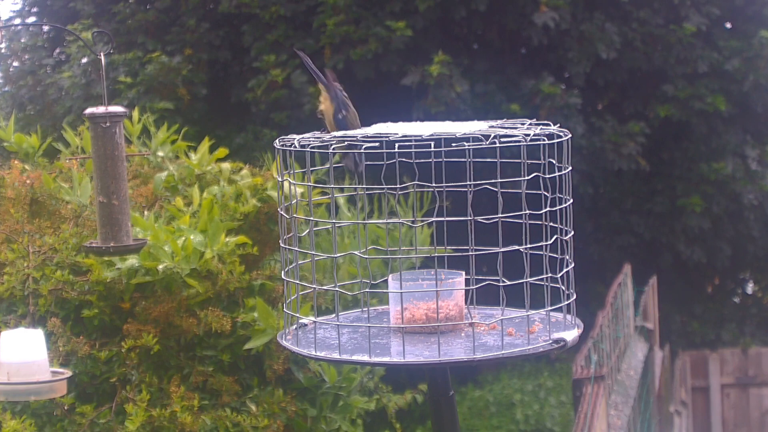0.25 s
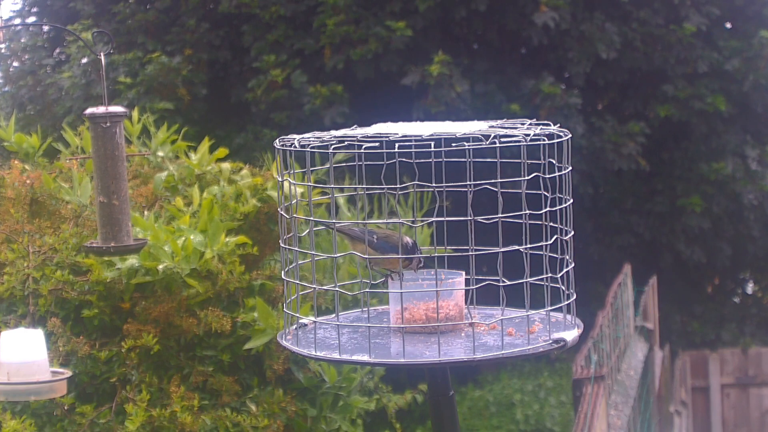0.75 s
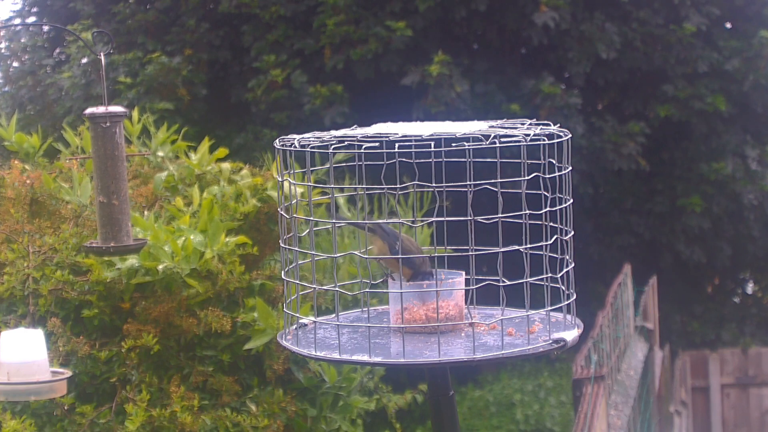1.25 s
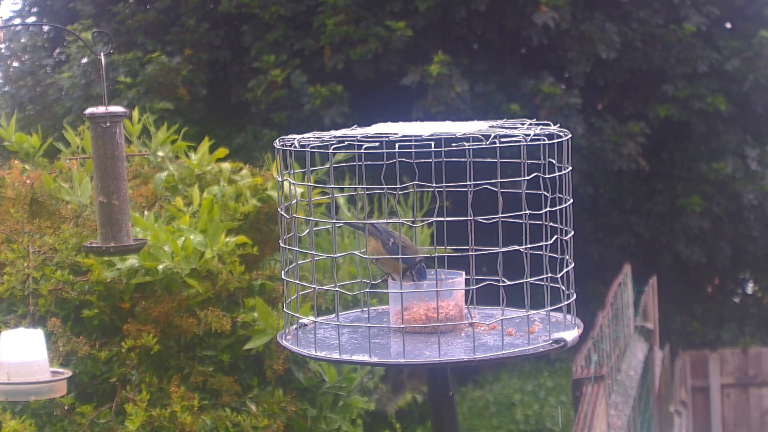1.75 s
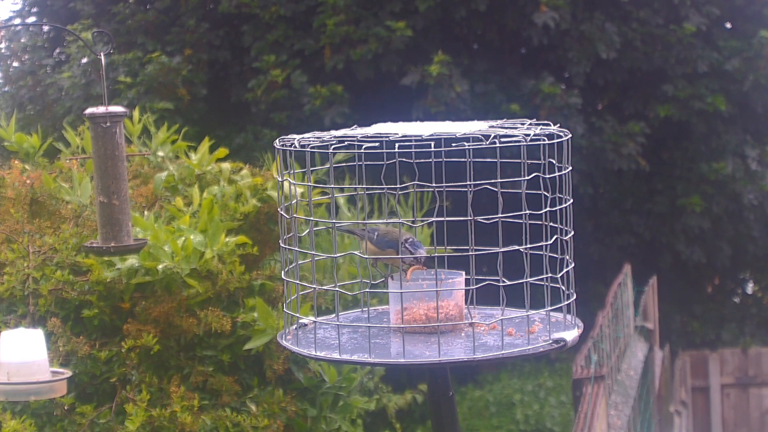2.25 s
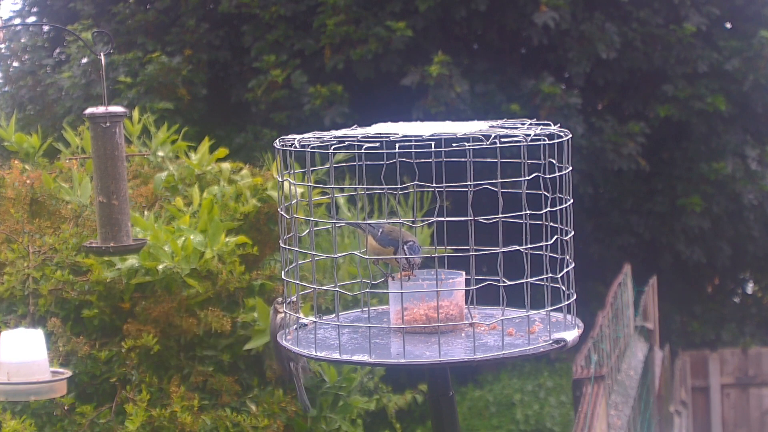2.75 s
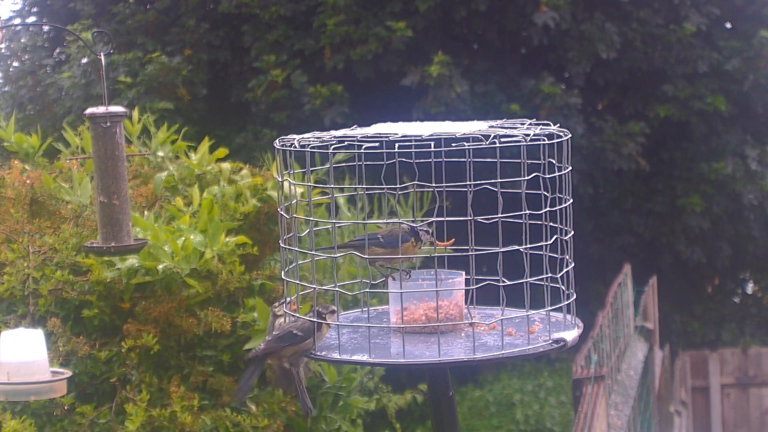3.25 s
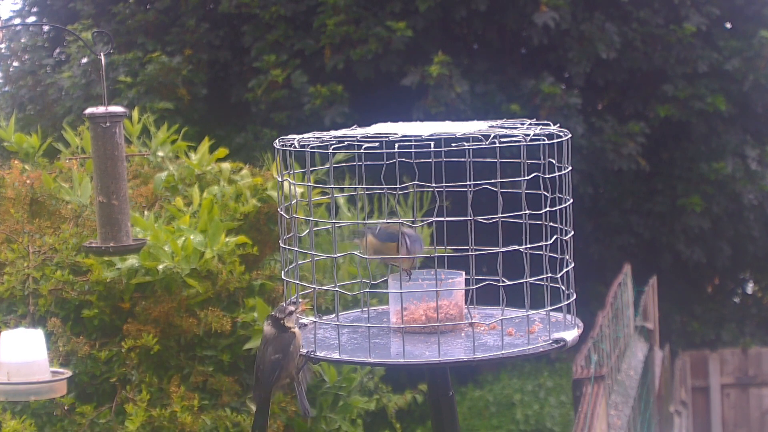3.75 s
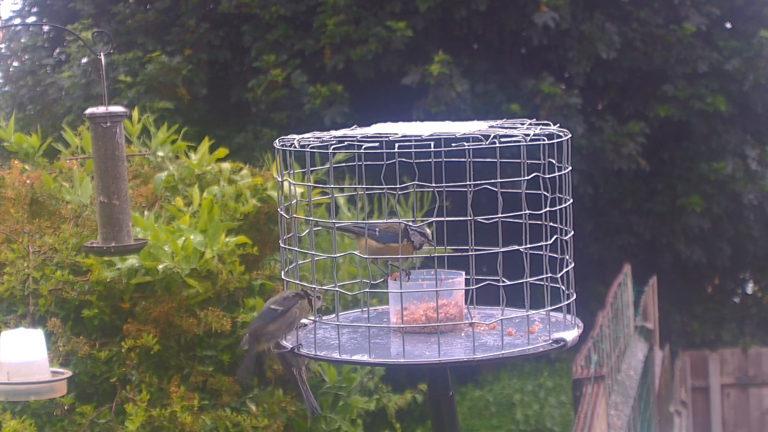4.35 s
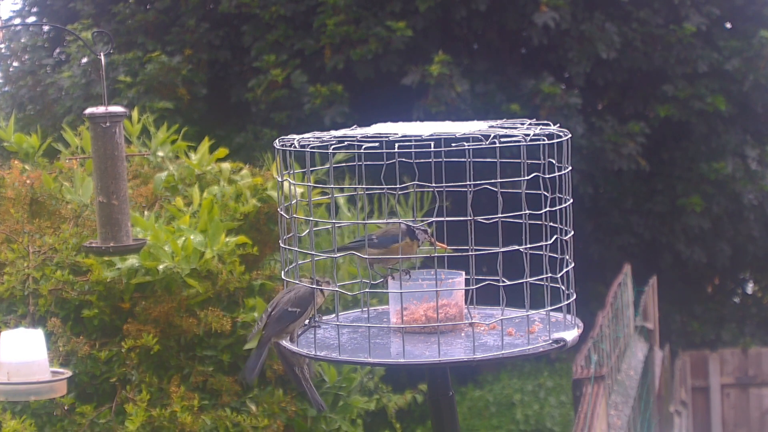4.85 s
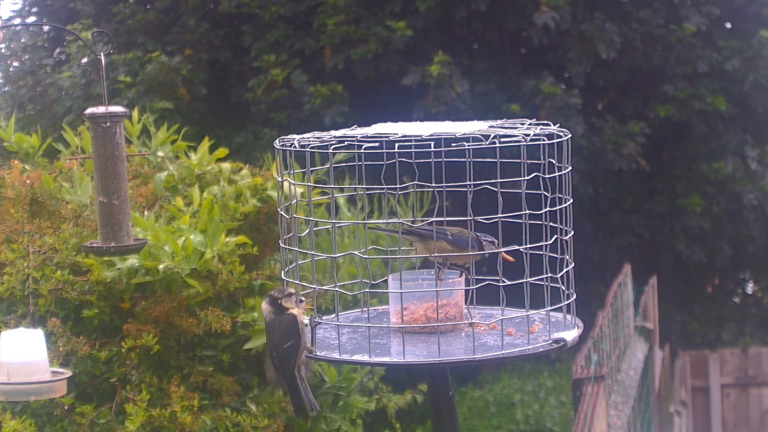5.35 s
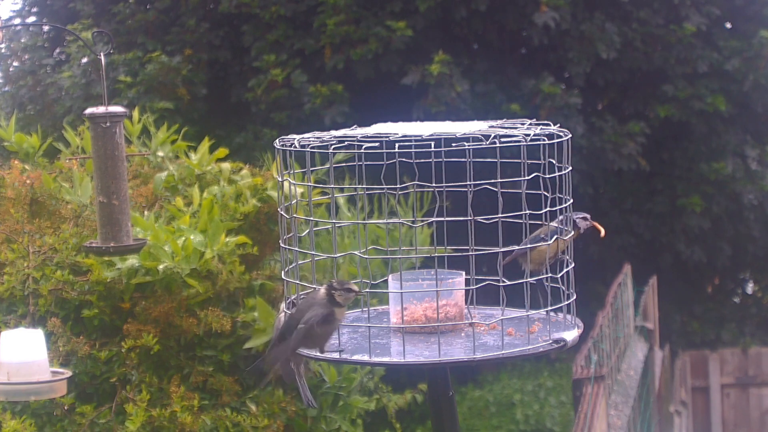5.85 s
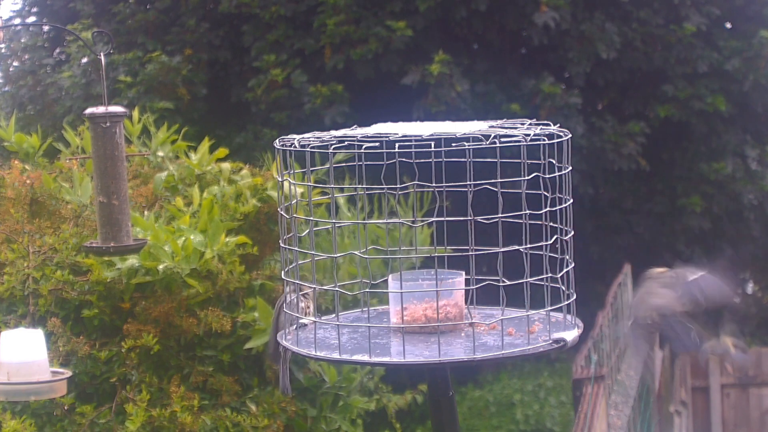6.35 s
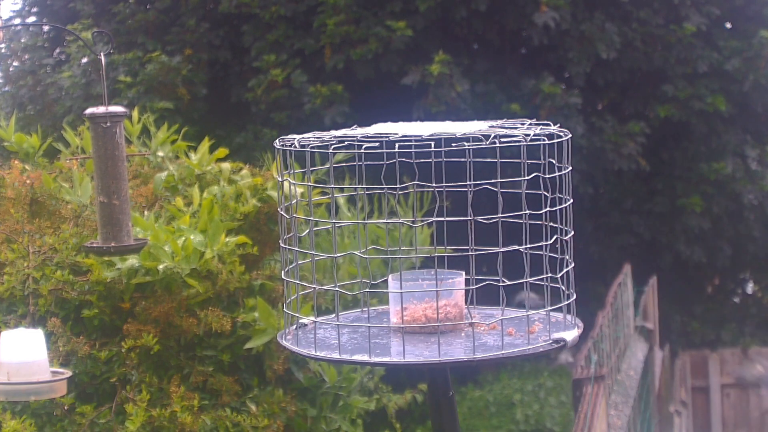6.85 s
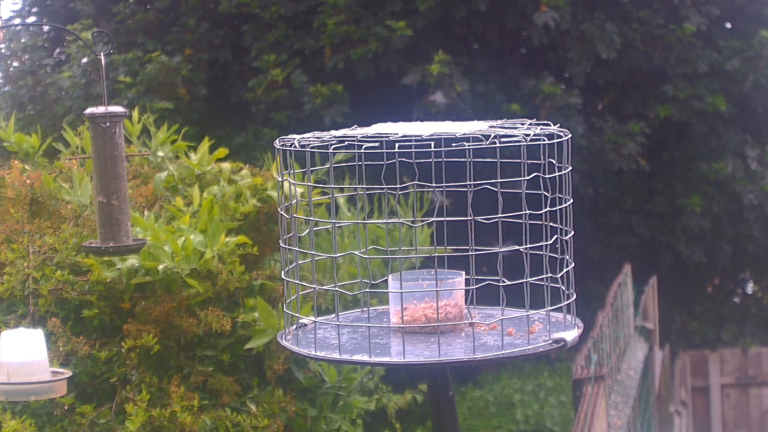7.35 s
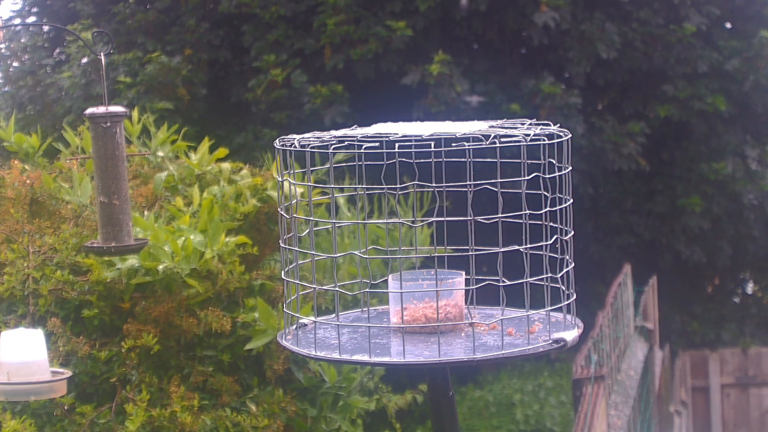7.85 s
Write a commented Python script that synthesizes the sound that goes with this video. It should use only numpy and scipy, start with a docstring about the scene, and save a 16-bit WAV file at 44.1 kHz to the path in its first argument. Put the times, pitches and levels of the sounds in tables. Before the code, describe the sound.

A young blue tit gives high chirps and raspy begging calls, with light ticks on wire, over steady outdoor hiss, rumble and hum.

```python
"""Blue tits at a caged garden feeder, over steady rumble, hiss and a small camera's mains hum.
A fledgling begs with both sides of its syrinx: first a faint wail, then rising chirps and whistles
that plunge. At 1.6 s a far engine winds down. From 3 s claws and beak tick on the wire; rasping
two-voiced wails follow from 3.5 to 7 s, with distant bird notes at 5.5 and 6.5 s. Fading chirps and
one tick end it. Fledgling and cage echo off the foliage and ring the camera's microphone."""
import sys
import numpy as np
from scipy import signal
from scipy.fft import rfft, irfft, next_fast_len
from scipy.io import wavfile
from scipy.ndimage import uniform_filter1d, map_coordinates

SR = 44100
rng = np.random.default_rng(int(sys.argv[2]) if len(sys.argv) > 2 else 0)


def bounce(signal):
    """Save signal as a 16-bit WAV file at the path given by the first command-line argument."""
    frames = np.transpose(np.atleast_2d(signal))
    limited = np.clip(frames, -1, 1)
    pcm = np.round(limited * 32767).astype(np.int16)
    wavfile.write(sys.argv[1], SR, pcm)


N = 357210

# mains hum and a motor line: freq_hz, rms_db
HUM_LINES = [(50, -53), (100, -66.5), (150, -64.5), (165.9, -69.5), (250, -77), (350, -91)]
# outdoor rumble spectrum: freq_hz, relative_db
RUMBLE_SPECTRUM = [(12, -16.5), (24, 4), (40, -2.5), (70, -6), (110, -13), (140, -7.5), (190, -16.5),
                   (260, -18.5), (400, -21.5), (700, -30), (1200, -40)]
# rain-like hiss spectrum: freq_hz, relative_db
HISS_SPECTRUM = [(350, -38), (600, -26.5), (850, -20.5), (1310, -15.5), (1870, -13), (2100, -10.5),
                 (2330, 1), (2450, 1.5), (2950, -12.5), (3630, -13), (4460, -28), (7420, -37), (8000, -41)]
# upper voice against lower: lower_pitch_hz, gain_db
UPPER_BALANCE = [(2000, 2), (2600, -2.5), (3300, 4.5), (4300, -13), (5800, -18), (7000, -37.5)]
# overtones, strongest on low pressed notes: lower_pitch_hz, gain_db
OVERTONE_GAIN = [(1900, 19), (2300, 6.5), (3200, 3), (4200, -5), (5000, -28)]
# hoarseness: lower_pitch_hz, noise_share
HOARSENESS = [(1900, .2), (2450, .4), (2900, .24), (3400, .16), (5000, .2), (6500, .08)]
# overtone gain as the open beak turns: time_s, gain_db
BEAK_BRIGHTNESS = [(0, -7), (3.1, -10.5), (3.45, 1), (4, 7), (4.21, 1.5), (4.35, 4), (5.1, 3), (6.25, 6.5),
                   (6.63, -13), (6.92, 1.5)]
# begging wails: start_s, rise_s, fall_s, start_hz, arch_hz, end_hz, leap_ratio, upper_ratio,
# opening_db, crest_db
WAILS = [(0, 0.006, 0.044, 3360, 3210, 2520, 0.85, 1.23, -61, -57),
         (3.466, .03, 0.084, 2033, 3600, 2975, 1.42, 1.21, -52, -43),
         (3.657, .056, .05, 1882, 3095, 2600, 1.23, 1.18, -44.5, -43),
         (3.803, .079, 0.018, 2017, 3460, 3130, 1.75, 1.32, -43, -41),
         (3.959, .068, 0.066, 1970, 3240, 2795, 1, 1.25, -43.5, -42.5),
         (4.191, .063, .03, 1978, 2382, 2110, 1.28, 1.204, -44.5, -39.5),
         (4.63, .062, .067, 1926, 3263, 2550, 1.1, 1.2, -47.5, -43.5),
         (5.101, .037, .018, 1953, 2450, 2084, 1.12, 1.2, -44, -40.5),
         (5.155, 0.029, 0.019, 1930, 1950, 1920, 1, 1.22, -51, -57),
         (6.158, .064, 0.05, 2088, 2892, 2540, 1, 1.136, -45, -47.5),
         (6.604, 0.02, 0.018, 2930, 3284, 3160, 1, 1.17, -51, -49),
         (6.911, .093, 0.045, 2372, 2856, 2674, 1, 1.35, -48, -49)]
# chirps: sweep_start_s, lead_s, length_s (from sweep start), top_hz, rasp_db, whistle_db
CHIRPS = [(0.194, 0.03, 0.11, 7140, -64, -59.5), (1.56, 0.023, 0.033, 6710, -58.5, -61.5),
          (1.66, 0.014, 0.072, 6910, -63.5, -56.5), (2.538, 0.038, 0.025, 6960, -51, -92.5),
          (2.631, 0.036, 0.042, 7200, -49, -73.5), (2.761, 0.028, 0.046, 7430, -48, -70),
          (2.891, 0.029, 0.027, 7110, -43.5, -61.5), (3.104, 0.021, 0.016, 6950, -42.5, -86),
          (3.204, 0.025, 0.067, 7795, -46, -47.5), (3.339, 0.022, 0.074, 7610, -48.5, -51),
          (4.351, 0.035, 0.038, 7150, -39.5, -47), (4.497, 0.039, 0.064, 7420, -42, -48),
          (5.219, 0.031, 0.03, 6980, -45.5, -52.5), (5.366, 0.026, 0.05, 7666, -48.5, -53),
          (5.472, 0.011, 0.058, 7920, -58, -62.5), (5.73, 0.014, 0.056, 7780, -56.5, -62.5),
          (5.84, 0.012, 0.082, 8020, -62, -51.5), (5.99, 0.011, 0.091, 7700, -58.5, -50),
          (6.638, 0.012, 0.02, 6980, -48.5, -63), (7.482, 0.037, 0.042, 7520, -60, -71.5),
          (7.59, 0.02, 0.04, 7650, -66, -78), (7.692, 0.016, 0.103, 7740, -75, -76.5),
          (7.959, 0.016, 0.043, 7350, -83, -76)]
# low rasp opening a chirp: lead_share_left, top_pitch_share, rasp_offset_db
CHIRP_LEAD_IN = [(1.1, .28, -11), (.6, .305, 0), (.25, .385, 1)]
# steep rise after the rasp: offset_s, top_pitch_share, rasp_offset_db
CHIRP_SWEEP = [(0, .52, -1), (.006, 0.67, -3), (0.011, .9, -7)]
# plunging whistles: start_s, whistle_s, tail_s, top_hz, end_hz, opening_db, whistle_db, low_db
PLUNGES = [(0.355, 0.056, 0.047, 7020, 2935, -76, -48.5, -49.5),
           (1.804, 0.023, .06, 6370, 2430, -37, -50.5, -54),
           (6.721, 0.068, 0.0056, 7400, 3300, -83, -47.5, -49.5)]
# far engine: start_s, start_hz, final_hz, level_db
FAR_ENGINE = (1.6, 246.5, 186, -66)
# claws and beak on the cage: start_s, peak_db
CAGE_CONTACTS = [(2.955, -44), (3.011, -40), (3.060, -44), (3.261, -43), (3.302, -38), (3.406, -48),
                 (7.883, -44)]
# cage wire modes: freq_hz, relative_db, t60_s
WIRE_MODES = [(2510, 3.5, 0.036), (2820, 26, 0.0091), (3290, 5.5, 0.013), (3700, 7.5, .018)]
# distant bird notes: start_s, length_s, start_hz, end_hz, level_db
FAR_BIRD_NOTES = [(6.47, .11, 1125, 1140, -75), (5.51, .03, 1980, 1750, -67)]
# sound sent by way of the foliage: time_s, gain_db
FOLIAGE_SEND = [(0, 8.5), (2.65, 15), (3.2, 4.5), (6.199, 5), (6.62, 12.5), (7, 6)]
# microphone response: freq_hz, gain_db
MIC_RESPONSE = [(1500, -16.5), (2100, -10.5), (2430, 5.5), (2900, -4), (3700, 2), (4600, -7.5),
                (5700, -8.5), (7200, -5.5), (8000, -15.5)]
# camera output filter: freq_hz, gain_db
OUTPUT_FILTER = [(7300, -1), (7700, -0.5), (8000, -10.5), (8400, -10), (8900, -32), (9300, -34)]


def amp(db):
    """Decibels to gain."""
    return 10 ** (np.asarray(db) / 20)


def unit(x):
    """Scale to rms 1."""
    return x / np.sqrt(np.mean(x ** 2) + 1e-20)


def at_hz(points, hz):
    """Read (freq_hz, value) points on a log axis."""
    freq_hz, values = np.transpose(points)
    return np.interp(np.log(hz + 1), np.log(freq_hz + 1), values)


def wobble(rate_hz, n):
    """Smooth random curve, knots at rate_hz."""
    knots = rng.standard_normal(int(n * rate_hz / SR) + 4)
    return map_coordinates(knots, [np.arange(n) * rate_hz / SR])


def filtered(x, response):
    """Zero-phase filter, gain response(hz)."""
    size = next_fast_len(N + SR // 2)
    return irfft(rfft(x, size) * response(np.fft.rfftfreq(size, 1 / SR)), size)[:N]


def add(track, start_s, sound):
    """Mix sound into track."""
    part = track[max(round(start_s * SR), 0):][:len(sound)]
    part += sound[:len(part)]


def glide(rows, smooth_s=.004):
    """Rows of (time_s, values...) to per-sample curves, corners rounded."""
    times_s, *columns = np.transpose(rows)
    t = np.arange(times_s[0], max(times_s[-1], times_s[0] + smooth_s * 2), 1 / SR)
    return [uniform_filter1d(np.interp(t, times_s, c), int(smooth_s * SR)) for c in columns]


def fade(n, edge_s=.001):
    """Soft start and end."""
    return signal.windows.tukey(n, min(2 * edge_s * SR / n, 1))


def phase_of(hz):
    """Running phase in radians."""
    return 2 * np.pi * np.cumsum(hz) / SR


def hum(waver_db=1.3):
    """Mains and motor lines, wavering in level."""
    t = np.arange(N) / SR
    return sum(np.sqrt(2) * amp(db + waver_db * wobble(3.022, N))
               * np.sin(2 * np.pi * (hz * t + rng.random())) for hz, db in HUM_LINES)


def background(rumble_db=-60, hiss_db=-60):
    """Outdoor rumble; even hiss peaking at the microphone's resonance."""
    def noise(spectrum):
        return unit(filtered(rng.standard_normal(N), lambda hz: amp(at_hz(spectrum, hz))))

    rumble = amp(rumble_db + .7 * wobble(3, N)) * noise(RUMBLE_SPECTRUM + [(3000, -100)])
    return rumble + amp(hiss_db) * noise(HISS_SPECTRUM)


def syrinx(rows, strain=1, side_db=-27, flutter_db=2):
    """Two coupled sides whistle at once. Rows: time_s, lower_hz, upper_hz, level_db."""
    lower_hz, upper_hz, level_db = glide(rows)
    n = len(lower_hz)
    hoarse = np.clip(strain * at_hz(HOARSENESS, lower_hz), 0, 1)
    jitter = .045 * hoarse
    low = phase_of(lower_hz * (1 + jitter * wobble(600, n)))
    high = phase_of(upper_hz * (1 + jitter * wobble(600, n)))

    def partial(phase):
        """Tone whose chaotic part forms a noise skirt."""
        skirt = (wobble(1600, n) * np.sin(phase) + wobble(1600, n) * np.cos(phase)) / np.sqrt(2)
        return np.sqrt(1 - hoarse ** 2) * np.sin(phase) + hoarse * skirt

    balance = amp(at_hz(UPPER_BALANCE, lower_hz))
    low_gain = amp(flutter_db * wobble(247, n)) / np.hypot(1, balance)
    high_gain = balance * amp(flutter_db * wobble(220, n)) / np.hypot(1, balance)
    overtones = amp(-15) * low_gain * partial(2 * low)
    overtones += high_gain * (amp(-19) * partial(low + high) + amp(-27) * partial(2 * high))
    overtones += amp(-34) * low_gain * partial(3 * low) + amp(-36) * partial(2 * low - high)
    beak_db = np.interp(rows[0][0] + np.arange(n) / SR, *np.transpose(BEAK_BRIGHTNESS))
    overtones *= amp(at_hz(OVERTONE_GAIN, lower_hz) + beak_db)
    side_tones = amp(side_db) * high_gain * (partial(2 * high - low) + partial(3 * high - 2 * low) / 2)
    voices = low_gain * partial(low) + high_gain * partial(high)
    return np.sqrt(2) * amp(level_db) * fade(n, edge_s=.008) * (voices + side_tones + overtones)


def wails(gain_db=-1, fall_db=-6, quaver=.0031, leap_s_per_ratio=.007):
    """Begging calls: the pitch arches; a hard push makes it leap at the crest."""
    out = np.zeros(N)
    for start_s, rise_s, fall_s, start_hz, arch_hz, end_hz, leap, ratio, opening_db, crest_db in WAILS:
        t = np.arange(-rise_s, fall_s, 1 / SR)  # 0 at the crest
        before = np.clip(-t / rise_s, 0, 1) ** 1.8
        after = np.clip(t / fall_s, 0, 1) ** 2.4
        hz = arch_hz + (start_hz - arch_hz) * before + (end_hz - arch_hz) * after
        hz *= leap ** np.exp(-(t / (leap_s_per_ratio * leap)) ** 2)
        hz *= 1 + quaver * wobble(90, len(t))
        db = crest_db + (opening_db - crest_db) * before + fall_db * after
        add(out, start_s, syrinx(np.column_stack([start_s + rise_s + t, hz, hz * ratio, db])))
    return amp(gain_db) * out


def echoes(x, t60_s, patterns=27):
    """Scattered echoes; the pattern changes as the birds move."""
    out, t = np.zeros(N), np.arange(SR // 2) / SR
    hop = N // patterns + 1
    lead = hop - hop // 2
    window = signal.windows.hann(2 * hop)
    for start in range(0, N, hop):
        tail = rng.standard_normal(len(t)) * amp(-60 * t / t60_s) * (t > .001)
        piece = np.pad(x, hop)[start + hop // 2:][:2 * hop]
        wet = signal.fftconvolve(piece * window[:len(piece)], tail / np.linalg.norm(tail))
        add(out, max(start - lead, 0) / SR, wet[max(lead - start, 0):])
    return out


def microphone(x, size=2048):
    """Minimum-phase response: its peaks ring after the sound."""
    cepstrum = irfft(np.log(amp(at_hz(MIC_RESPONSE, np.fft.rfftfreq(size, 1 / SR)))))
    cepstrum[1:size // 2] *= 2
    cepstrum[size // 2 + 1:] = 0
    return signal.fftconvolve(x, irfft(np.exp(rfft(cepstrum))))[:N]


def chirps(gain_db=-1, upper_ratio=1.2, sweep_ratio=1.3, rise_s=.017, sag_hz_per_s=11000, sag_db=-2):
    """A rasp sweeps up into a thin, sagging whistle."""
    out = np.zeros(N)
    for sweep_s, lead_s, length_s, top_hz, rasp_db, whistle_db in CHIRPS:
        held_s = max(length_s - rise_s, .0022)
        beam_db = 4.2 * np.interp(sweep_s, *np.transpose(BEAK_BRIGHTNESS))
        path = [(-left * lead_s, share * top_hz, upper_ratio, rasp_db + db)
                for left, share, db in CHIRP_LEAD_IN]
        # sweep: upper voice runs ahead; higher pitch beams more
        path += [(offset_s, share * top_hz, sweep_ratio, rasp_db + db + beam_db * (share - .5))
                 for offset_s, share, db in CHIRP_SWEEP]
        path += [(rise_s, top_hz, upper_ratio, whistle_db),
                 (rise_s + held_s, top_hz - sag_hz_per_s * held_s, upper_ratio, whistle_db + sag_db)]
        rows = [(sweep_s + offset_s, hz, hz * ratio, db) for offset_s, hz, ratio, db in path]
        add(out, rows[0][0], syrinx(rows, strain=1.15, side_db=-16))
    return amp(gain_db) * out


def plunges(upper_ratio=1.22, break_hz=3558, break_s=.0165, sag_hz_per_s=20000, swell_db=9, tail_db=-6):
    """The voice flips up to a whistle, swells as it sinks, breaks back down and trails off."""
    out = np.zeros(N)
    for start_s, whistle_s, tail_s, top_hz, end_hz, opening_db, whistle_db, low_db in PLUNGES:
        times_s = start_s + np.cumsum([0, break_s, whistle_s, break_s, tail_s])
        hz = np.array([break_hz, top_hz, top_hz - sag_hz_per_s * whistle_s, break_hz, end_hz])
        db = [opening_db, whistle_db - swell_db, whistle_db, low_db, low_db + tail_db]
        add(out, start_s, syrinx(np.column_stack([times_s, hz, hz * upper_ratio, db])))
    return out


def far_tone(hz, db, waver=.0044, flicker_db=3):
    """A tone wavering on its way through the garden."""
    n = len(hz)
    envelope = np.sqrt(2) * fade(n) * amp(db + flicker_db * wobble(25, n))
    return envelope * np.sin(phase_of(hz * (1 + waver * wobble(54, n))))


def far_engine(pitch_tau_s=1.05, attack_s=.28, fade_db_per_s=8.5):
    """An engine winds down: its tone swells, sinks and fades."""
    out, t = np.zeros(N), np.arange(2 * SR) / SR
    start_s, start_hz, final_hz, level_db = FAR_ENGINE
    hz = final_hz + (start_hz - final_hz) * np.exp(-t / pitch_tau_s)
    db = level_db - fade_db_per_s * np.maximum(t - attack_s, 0)
    add(out, start_s, np.minimum(t / attack_s, 1) * far_tone(hz, db))
    return out


def cage_ticks(crack_db=-3, crack_t60_s=.0056):
    """Each contact cracks dully and rings the wire."""
    out, t = np.zeros(N), np.arange(SR // 10) / SR
    for start_s, peak_db in CAGE_CONTACTS:
        ring = sum(amp(db + rng.normal(0, 3.6) - 60 * t / t60_s) * np.sin(2 * np.pi * hz * t)
                   for hz, db, t60_s in WIRE_MODES)
        noise = unit(np.diff(uniform_filter1d(rng.standard_normal(len(t) + 1), size=5)))
        crack = noise * amp(crack_db - 60 * t / crack_t60_s)
        tick = (ring + crack) * fade(len(t), edge_s=.0005)
        add(out, start_s, amp(peak_db) * tick / np.abs(tick).max())
    return out


def far_birds():
    """Two faint gliding notes."""
    out = np.zeros(N)
    for start_s, length_s, start_hz, end_hz, level_db in FAR_BIRD_NOTES:
        add(out, start_s, far_tone(np.linspace(start_hz, end_hz, int(length_s * SR)), level_db))
    return out


def scene():
    """Fledgling and cage with their echoes, over far sounds, hum and noise. Mono."""
    direct = wails() + chirps() + plunges() + cage_ticks()
    scattered = direct * amp(np.interp(np.arange(N) / SR, *np.transpose(FOLIAGE_SEND)))
    foliage = amp(-8.5) * echoes(scattered, t60_s=.06)
    hedge = amp(-13.5) * echoes(scattered, t60_s=.18)
    garden = amp(-19) * echoes(direct, t60_s=.38)
    feeder = microphone(direct + foliage + hedge + garden)
    return (feeder + far_engine() + far_birds() + hum() + background())[None]


def record(dry, rate_hz=16000, cutoff_hz=9200):
    """The camera samples slowly: the top whistles get a weak mirror image above half its rate."""
    band = filtered(dry[0], lambda hz: hz < rate_hz / 2)
    mirrored = band * (1 + 2 * np.cos(2 * np.pi * rate_hz * np.arange(N) / SR))
    return filtered(mirrored, lambda hz: amp(at_hz(OUTPUT_FILTER, hz)) * (hz < cutoff_hz))[None]


dry = scene()
out = record(dry)
bounce(out)
```